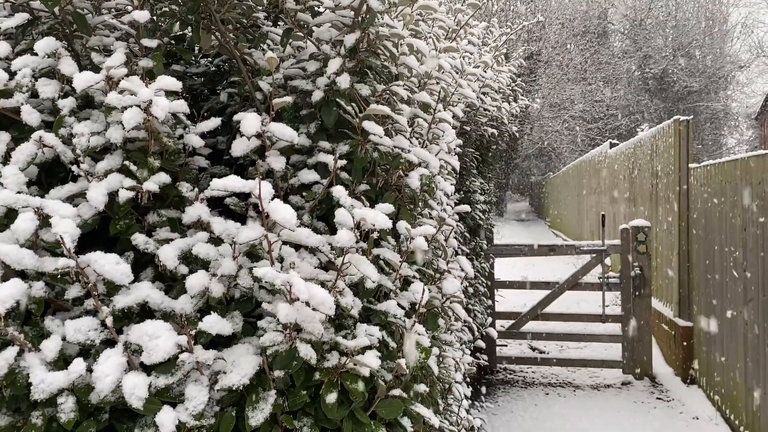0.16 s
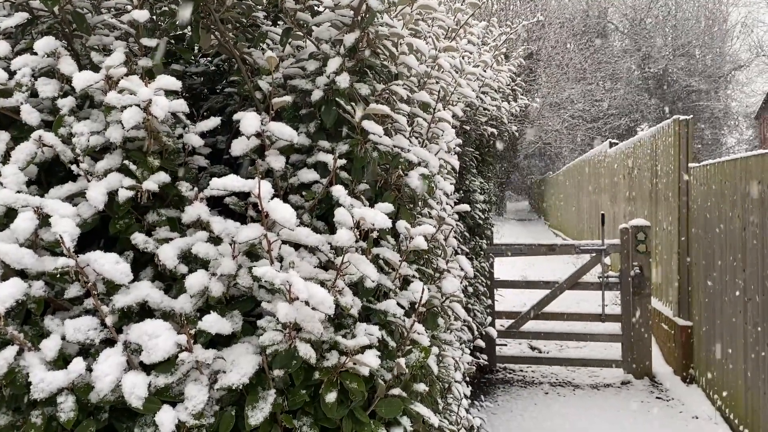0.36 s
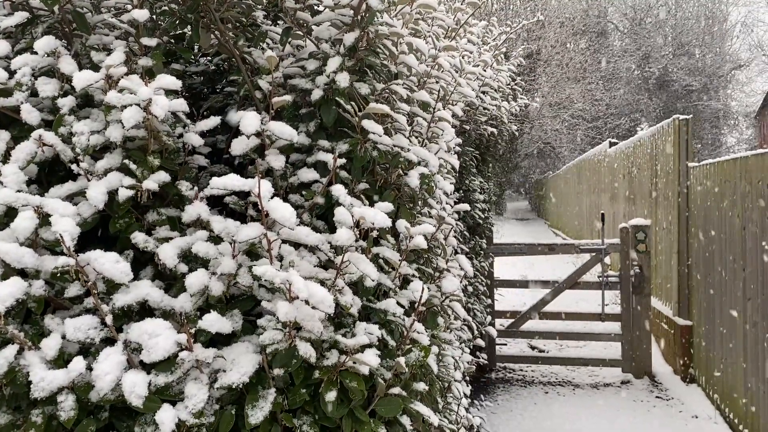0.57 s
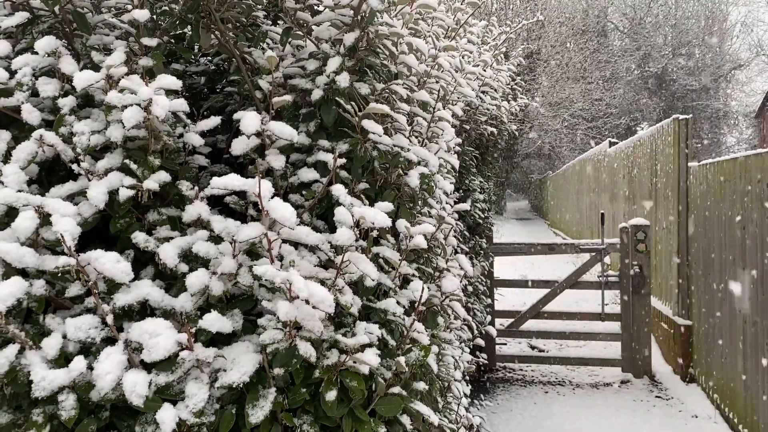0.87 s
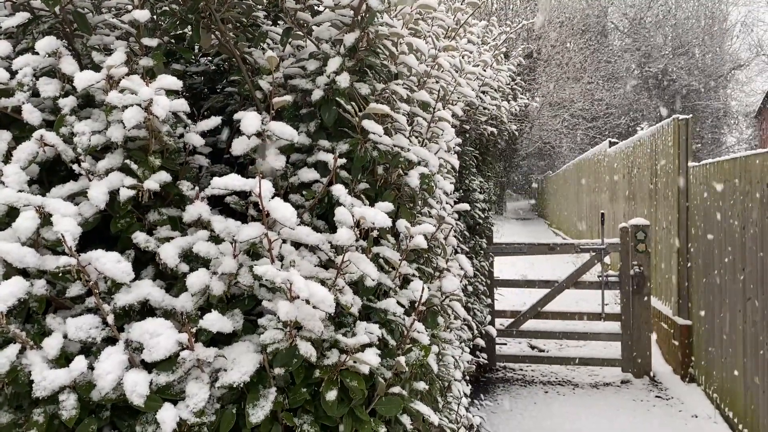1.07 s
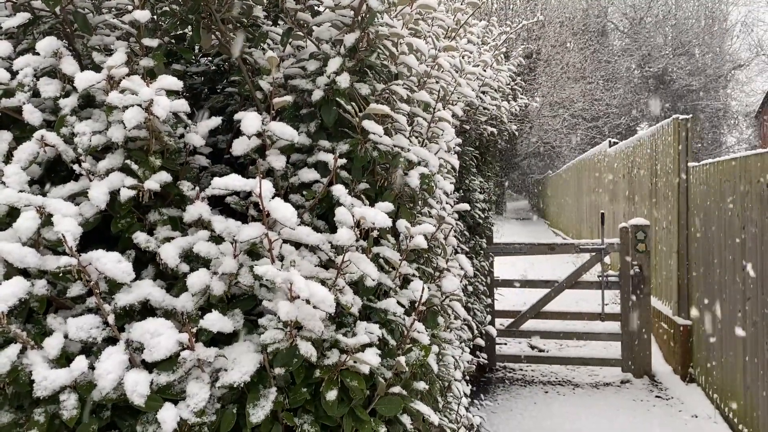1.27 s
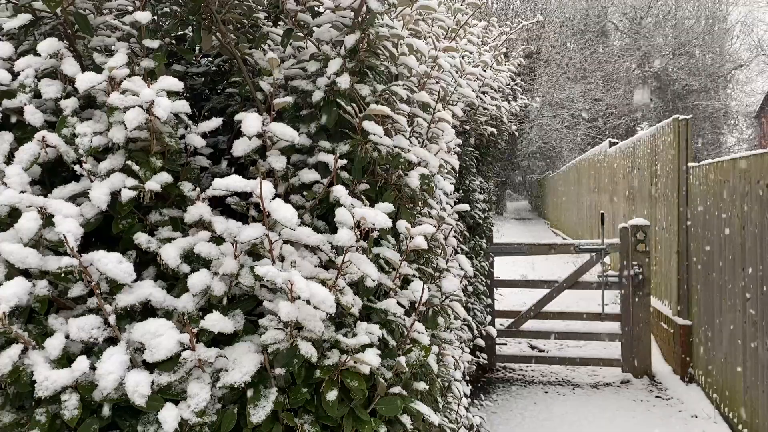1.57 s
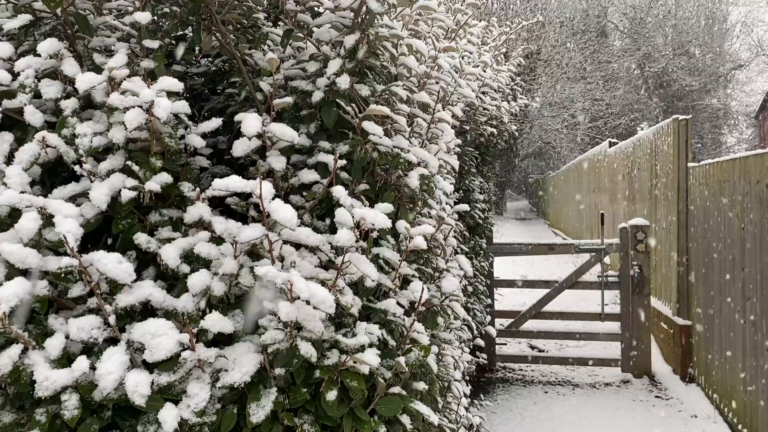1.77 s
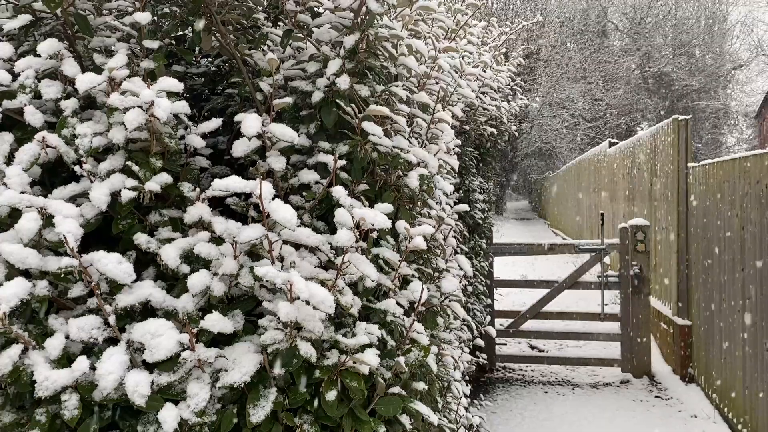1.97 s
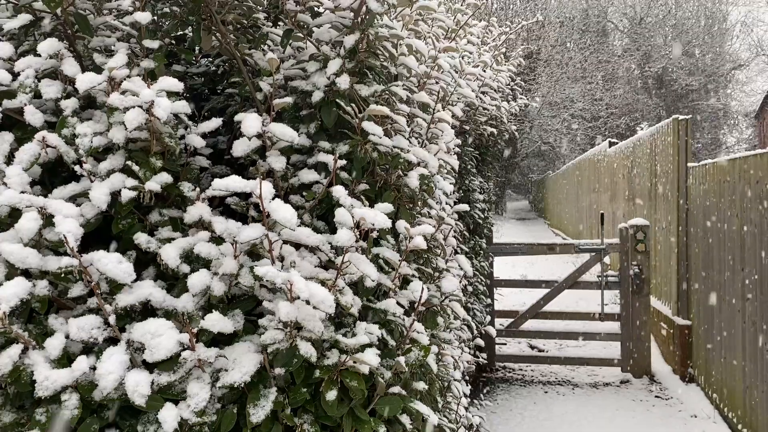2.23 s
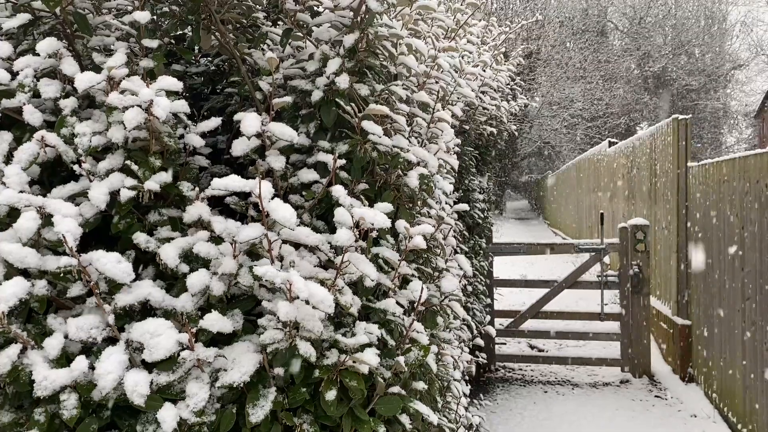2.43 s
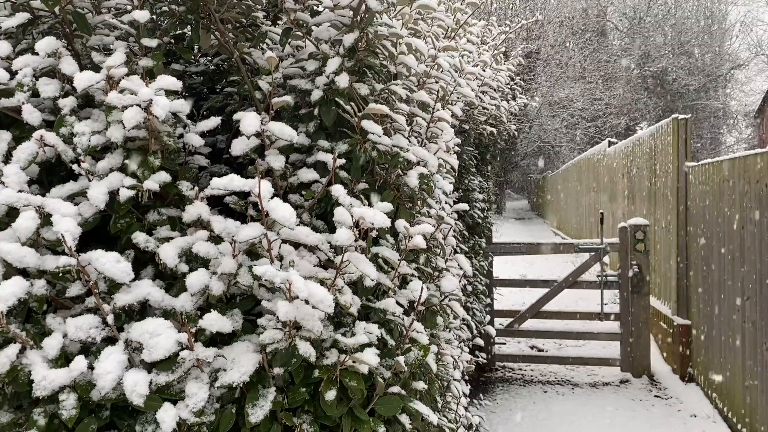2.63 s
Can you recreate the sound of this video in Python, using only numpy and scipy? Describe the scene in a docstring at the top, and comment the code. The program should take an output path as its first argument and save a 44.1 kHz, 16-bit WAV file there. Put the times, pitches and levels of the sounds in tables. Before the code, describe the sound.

A crow at some distance gives two hoarse, falling caws with a short diffuse echo from fence and trees, after a second of low wind thumps, faint traffic hum, tiny snow ticks and microphone hiss.

```python
"""A crow some way off caws twice over a snowy lane: rough pulses and breath shaped by a closing beak, with a
fence echo and an answer from hedges and trees. A farther crow is faintly heard, softer and duller.
Light wind thumps on the microphone as short low pushes over a flutter; distant traffic hums as shaped noise.
Snowflakes tick on the housing as tiny noise bursts, and the microphone pair hisses."""
import sys
import numpy as np
from scipy import signal
from scipy.fft import rfft, irfft, next_fast_len
from scipy.io import wavfile
from scipy.ndimage import uniform_filter1d, map_coordinates

SR = 44100
rng = np.random.default_rng(int(sys.argv[2]) if len(sys.argv) > 2 else 0)


def bounce(signal):
    """Save signal as a 16-bit WAV file at the path given by the first command-line argument."""
    frames = np.transpose(np.atleast_2d(signal))
    limited = np.clip(frames, -1, 1)
    pcm = np.round(limited * 32767).astype(np.int16)
    wavfile.write(sys.argv[1], SR, pcm)


def level_to_linear(level):
    """Convert decibel levels to linear amplitude factors, elementwise."""
    exponent = np.asarray(level, float) / 20
    return 10 ** exponent


N = 123479
T = np.arange(N) / SR


def unit(x):
    """Scale to rms 1."""
    return x / np.sqrt(np.mean(x ** 2) + 1e-20)


def along(points, hz):
    """Read a curve of (Hz, value) points on a log frequency axis."""
    f, v = np.transpose(points)
    return np.interp(np.log(hz + 1), np.log(f + 1), v)


def wobble(rate):
    """A smooth random curve with rate knots a second."""
    return map_coordinates(rng.standard_normal(N // 20), [T * rate])


def filtered(x, response):
    """Multiply the spectrum of x by a response of frequency."""
    m = next_fast_len(N + SR // 2)
    hz = np.fft.rfftfreq(m, 1 / SR)
    return irfft(rfft(x, m) * response(hz), m)[..., :N]


def coloured(x, points):
    """Shape x with a curve of (Hz, dB) points."""
    return filtered(x, lambda hz: level_to_linear(along(points, hz)))


def patchy(patchy_db):
    """Two noises that grow and fade together in patches of time and frequency."""
    z = signal.stft(rng.standard_normal((2, N)), nperseg=512)[2]
    field = uniform_filter1d(rng.standard_normal(z.shape[1:]), size=8, axis=0)
    field = uniform_filter1d(field, size=10, axis=1)
    return signal.istft(z * level_to_linear(patchy_db * unit(field)), nperseg=512)[1][:, :N]


def spread(pair, alike):
    """Mix two noises into left and right with the given likeness by frequency."""
    def mid_side_gains(hz):
        angle = np.arccos(np.clip(along(alike, hz), -1, 1)) / 2
        return np.array([np.cos(angle), np.sin(angle)])

    mid, side = filtered(pair, mid_side_gains)
    return np.array([mid + side, mid - side])


def sides(x, pan_db, turn):
    """Make left and right of one sound, with level and phase offsets (radians) by frequency."""
    def response(hz):
        phase = np.exp(np.array([[-.5j], [.5j]]) * turn(hz))
        return phase * level_to_linear(np.array([[.5], [-.5]]) * pan_db(hz))

    return filtered(x, response)


def ports(x):
    """Sound born in the housing reaches the two ports with a treble phase that winds up."""
    from_hz, full_turn_hz = 6880, 4380  # right gains a full turn on left per 4380 Hz above 6880 Hz
    return sides(x, lambda hz: 0 * hz, lambda hz: 2 * np.pi * np.maximum(hz - from_hz, 0) / full_turn_hz)


# How much of the hiss both sides have in common. Each row: frequency in Hz, share of the power, 0 to 1.
HISS_SHARE = [(2500, .15), (5800, .2), (7000, .8), (12000, .76)]
# Tone of the hiss. Each row: frequency in Hz, relative level in dB per Hz.
HISS_TONE = [(1500, -21), (2400, 2), (3300, -2.5), (5000, -3.5), (7300, -6.5), (9200, -6), (11200, -6.5),
             (13200, -8), (15000, -9), (15900, -13.5), (17000, -47)]


def hiss():
    """Microphone noise; in the treble both sides carry mostly the same noise."""
    level_db = -85.5
    shared = lambda hz: np.clip(along(HISS_SHARE, hz), 0, 1)
    own = filtered(patchy(2.8), lambda hz: np.sqrt(1 - shared(hz)))
    common = ports(filtered(patchy(0.49)[0], lambda hz: np.sqrt(shared(hz))))
    return level_to_linear(level_db + 0.27 * wobble(6.2)) * unit(coloured(own + common, HISS_TONE))


# Tone of the far roar. Each row: frequency in Hz, relative level in dB.
TRAFFIC_TONE = [(60, -15), (150, -1.5), (300, -6.5), (550, -7.5), (900, -9), (1500, -13.5), (1900, -20),
                (2200, -29), (3500, -58), (6000, -64)]
# How alike left and right are. Each row: frequency in Hz, likeness from -1 (opposite) to 1 (the same).
TRAFFIC_LIKENESS = [(150, 0.6), (380, .4), (700, -0.08), (1400, -0.45), (2200, 0.4)]


def traffic():
    """A far, smooth roar with little treble: shaped noise whose level sways gently."""
    level_db, sway_db = -66, .8
    level = level_to_linear(level_db + sway_db * wobble(3.5))
    return level * unit(spread(coloured(patchy(2.0), TRAFFIC_TONE), TRAFFIC_LIKENESS))


# Single wind pushes. Each row: centre in seconds, peak in dB before a random left-right lean,
# pitch at the centre in Hz, width in seconds (widened where it is under least_s).
WIND_THUMPS = [(0.249, -37, 82, 0.015), (0.332, -40, 76, 0.022), (0.359, -41, 78, 0.014),
               (0.378, -44.5, 80.4, 0.017), (0.414, -28, 119.4, 0.012), (0.448, -33.5, 84, 0.0075),
               (0.476, -36, 103.7, 0.01), (0.521, -54, 69, 0.011), (0.556, -30, 72, 0.012),
               (0.584, -35, 61, 0.022), (0.61, -35, 72.8, 0.015), (0.642, -44.5, 68, 0.017),
               (0.671, -35.5, 85.4, 0.014), (0.699, -38, 69, 0.023), (0.752, -43.5, 55.6, 0.017),
               (0.78, -41.5, 67, 0.035), (0.813, -46, 71, 0.01), (0.845, -40, 73, 0.031),
               (0.973, -52.5, 64.3, 0.045), (0.996, -37, 78, 0.022), (1.136, -37, 68, 0.014),
               (1.173, -42, 68, 0.019), (1.194, -50, 55.3, 0.014), (1.256, -44.5, 70, 0.015),
               (1.293, -44, 51.3, 0.014), (1.334, -56, 71, 0.0081), (1.376, -52.5, 62, 0.042),
               (1.981, -37, 63, 0.023), (2.072, -35.5, 70, 0.023), (2.152, -37.5, 76, 0.017),
               (2.177, -50, 66, 0.0094), (2.216, -43, 64.56, 0.012), (2.24, -39, 66, 0.009),
               (2.261, -36.5, 55, 0.017), (2.312, -42.5, 60.7, 0.016), (2.5, -39.5, 65.4, 0.033),
               (2.536, -46.5, 77, 0.027)]


def thumps():
    """Short low pushes of air that rise fast, die away more slowly and fall in pitch."""
    pitch_fall, least_s, lean_db = 0.84, 0.021, 1.6
    out = np.zeros((2, N))
    for s, db, hz, width in WIND_THUMPS:
        width = max(width, least_s)
        luck = rng.standard_normal(2)
        u = np.clip((T - s) / width, -4, 4)  # time in widths from the centre
        swell = np.exp(-np.where(u < 0, 3.5, 1.8) * u ** 2)
        phase = 2 * np.pi * hz * width * (u - pitch_fall * u ** 2 / 2) + 2 * luck[0]
        out += level_to_linear(db + lean_db * luck[1] * np.array([[1], [-1]])) * swell * np.cos(phase)
    return out


# Strength of the flutter. Each row: time in seconds, level in dB before lift_db and the random wobble.
FLUTTER_LEVEL = [(0.0, -58), (0.15, -58.5), (0.32, -52.5), (0.47, -42.5), (0.55, -53.5), (0.93, -61),
                 (1.02, -50), (1.22, -55.5), (1.64, -58), (1.77, -60), (2.04, -59), (2.16, -53),
                 (2.42, -61), (2.57, -56.5), (2.8, -62)]
# Tone of the flutter. Each row: frequency in Hz, relative level in dB per Hz.
FLUTTER_TONE = [(12, -42), (20, -1), (48, -4.5), (64, 1), (82, -6.5), (119, -14.5), (173, -16),
                (260, -28.5), (340, -30.5), (570, -120)]


def wind():
    """Single pushes over a lumpy low flutter of shaped noise."""
    lift_db = 3.06
    pushes = thumps()
    level_db = np.interp(T, *np.transpose(FLUTTER_LEVEL)) + 2.8 * wobble(14)
    flutter = spread(coloured(patchy(2.3), FLUTTER_TONE), [(30, 0.44), (130, .8)])
    return pushes + level_to_linear(level_db + lift_db) * unit(flutter)


# Clear snowflake ticks. Each row: start in seconds, click strength in dB before the noise and housing
# shape it, spray in dB relative to the click.
FLAKE_TICKS = [(0.1087, -66, -14.5), (0.652, -53, -18.5), (0.6546, -59, -19), (0.6633, -49.5, -20),
               (0.6714, -78.5, -13), (0.7368, -64.5, -8), (0.8135, -80, -16), (1.5517, -70, -16),
               (1.5768, -67, -20), (1.6245, -68, -13), (1.6494, -69, -16), (1.9021, -70, -5),
               (2.1524, -71, -18), (2.1987, -57.5, -20)]
# Ring of the housing. Each row: frequency in Hz, gain in dB.
HOUSING_TONE = [(2000, -32), (3800, -17.5), (5600, -23), (7500, -7.5), (9100, -11), (11300, -5.5),
                (13400, -7), (15000, -4), (16300, -21)]


def snow():
    """Each flake: a tiny click and a short spray, rung by the housing; many faint ones fall at random."""
    click_s, spray_s = .0003, 0.019
    faint_per_s, faint_db, faint_spray_db = 18, -85, -5
    luck = rng.random((200, 2))
    faint_start = np.cumsum(-np.log(1 - luck[:, 0])) / faint_per_s
    faint = np.c_[faint_start, faint_db + 9 * luck[:, 1], np.full(200, faint_spray_db)]
    shape, t = np.zeros(N + SR), T[:SR // 8]
    click = t / click_s * np.exp(1 - t / click_s)
    spray = np.exp(-t / spray_s)
    for s, db, spray_db in [*FLAKE_TICKS, *faint[faint_start < N / SR]]:
        shape[round(s * SR):][:len(t)] += level_to_linear(db) * (click + level_to_linear(spray_db) * spray)
    return ports(coloured(shape[:N] * rng.standard_normal(N), HOUSING_TONE))


# How long the answer rings. Each row: frequency in Hz, seconds to fall by 60 dB.
TREES_RING = [(500, 0.4), (1800, 0.61), (3500, .25), (8000, 0.04)]


def trees(x):
    """Diffuse answer of hedges and trees: fading noise tails, drawn anew every quarter second."""
    out, step = np.zeros((2, N + SR)), SR // 4
    for i in range(0, N, step):
        hz, t, z = signal.stft(rng.standard_normal((2, SR // 2)), SR, nperseg=256)
        fade = level_to_linear(-60 * t / along(TREES_RING, hz)[:, None])
        tail = signal.istft(z * fade, SR, nperseg=256)[1]
        wet = signal.fftconvolve(x[None, i:i + step], tail / np.linalg.norm(tail[0]), axes=1)
        out[:, i:i + wet.shape[1]] += wet
    return out[:, :N]


def fence_echo(x):
    """One weaker, later copy of the call."""
    delay_s, level_db = .125, -18.5
    return level_to_linear(level_db) * np.pad(x, (round(delay_s * SR), 0))[:N]


def syrinx(pitch_hz):
    """Uneven pulses mixed with breath noise that swells once a cycle, all shaken by a rattle."""
    jitter, waver, shimmer_db = .027, .01, 2.4  # cycles, share of the pitch, dB from pulse to pulse
    rasp_share, rattle_hz, rattle_depth = .36, 62, .2  # rasp_share is the breath's part of the power
    cycles = np.cumsum(pitch_hz * (1 + waver * wobble(70))) / SR
    luck = rng.standard_normal((N // 50, 2))
    k = np.arange(1, int(cycles[-1]))
    at = np.interp(k + jitter * luck[k, 0], cycles, np.arange(N))
    whole, part = np.minimum(at.astype(int), N - 2), at % 1
    size = level_to_linear(shimmer_db * luck[k, 1])
    # a pulse between two samples is shared out to both
    pulses = np.bincount(whole, size * (1 - part), N) + np.bincount(whole + 1, size * part, N)
    rasp = rng.standard_normal(N) * (1 + np.cos(2 * np.pi * cycles) / 2)
    rattle_cycles = np.cumsum(rattle_hz * (1 + 0.1205 * wobble(15))) / SR
    rattle = 1 + rattle_depth * np.sin(2 * np.pi * rattle_cycles)
    voice = np.sqrt(1 - rasp_share) * unit(pulses - pulses.mean()) + np.sqrt(rasp_share) * unit(rasp)
    return unit(rattle * voice)


# Throat with the beak open. Each row: frequency in Hz, relative level in dB.
OPEN_THROAT = [(400, -38.5), (800, -14), (1050, -9.5), (1300, -12), (1650, -8), (1980, -1.1), (2150, -9),
               (2400, -25.5), (2950, -15.5), (3200, -21.5), (3400, -19), (3750, -37), (4300, -40.5),
               (5250, -30.5), (5650, -19.5), (6100, -37.5), (7500, -43), (9000, -61.5)]
# Throat with the beak closing, point for point. Each row: frequency in Hz, relative level in dB.
CLOSING_THROAT = [(400, -40), (750, -17), (890, -10), (1150, -20), (1320, -6), (1420, -.2), (2120, -13),
                  (2450, -26), (2750, -25), (3100, -28), (3570, -22), (3900, -32), (4400, -37), (4950, -26),
                  (5400, -26), (6200, -40), (7500, -48), (9000, -70)]


def throat(closing):
    """Resonances slide in pitch and level from the open (0) to the closing (1) beak."""
    return (1 - closing) * np.array(OPEN_THROAT) + closing * np.array(CLOSING_THROAT)


# Caws of the farther crow. Each row: start in seconds, length in seconds, starting pitch in Hz,
# level in dB before the soft edges and the trees.
FARTHER_CAWS = [(-.2, 0.36, 327.5, -74.5), (1.914, .2, 313.3, -70)]


def far_crow():
    """Soft-edged, sagging caws that lost their treble on the way."""
    edge_s, sag, top_hz = 0.052, .06, 1980  # sag is the share of the pitch lost over a caw
    out = np.zeros(N)
    for s, length, hz, db in FARTHER_CAWS:
        gate = np.clip(np.minimum(T - s, s + length - T) / edge_s, 0, 1)
        pitch_hz = hz * (1 - sag * np.clip((T - s) / length, 0, 1))
        voice = coloured(syrinx(pitch_hz), throat(0.28))
        dull = filtered(voice, lambda f: 1 / (1 + (f / top_hz) ** 8))
        out += level_to_linear(db) * gate * unit(dull)
    return out


# The two near caws, each a list of points. Each row: time in seconds, pitch in Hz,
# level in dB before the voice is placed, beak closing from 0 to 1, treble in dB against the rest.
NEAR_CAWS = [
    [(1.135, 344.7, -101.5, 0.2, 1.5), (1.155, 344.3, -69.5, 0.2, 7.5), (1.19, 354.7, -63, .2, 4.5),
     (1.24, 364.2, -60, 0.07, -0.8), (1.35, 359.5, -59.5, 0.33, 1), (1.41, 336.9, -60, 0.2, .3),
     (1.5, 328.9, -59, 0.8, 1.8), (1.53, 315.8, -62.5, 0.86, 1.5), (1.565, 307.6, -62, 0.98, -6),
     (1.585, 305.2, -72.5, .8, 16), (1.62, 300, -102, 1, -10)],
    [(1.99, 305, -72.5, .1, -11), (2.008, 322.3, -69.5, 0, 8), (2.07, 336.5, -59.5, 0, 1),
     (2.16, 332.1, -56.5, 0.1, -1), (2.23, 319.7, -59.5, 0.64, 4), (2.3, 300.5, -60, 1, 2.4),
     (2.38, 286.3, -64, 0.97, 1), (2.41, 279.3, -64.5, .98, -7), (2.45, 279.6, -64, .99, -14),
     (2.468, 275, -99, 0.96, -12)],
]


def near_crow():
    """A rough voice whose throat resonances glide as the beak opens and closes."""
    treble_from_hz = 2350
    s, pitch_hz, level_db, closing, treble_db = np.transpose(np.concatenate(NEAR_CAWS))
    hz, t, z = signal.stft(syrinx(np.interp(T, s, pitch_hz)), SR, nperseg=1024, noverlap=896)
    beak = np.clip(np.interp(t, s, closing), 0, 1)
    gain_db = np.transpose([along(throat(c), hz) for c in beak])
    gain = level_to_linear(gain_db + (hz[:, None] > treble_from_hz) * np.interp(t, s, treble_db))
    gain = gain / np.linalg.norm(gain, axis=0)
    voice = signal.istft(z * gain, SR, nperseg=1024, noverlap=896)[1][:N]
    return level_to_linear(np.interp(T, s, level_db)) * unit(voice)


# Side the near crow leans to. Each row: frequency in Hz, left minus right in dB.
CROW_LEAN = [(1000, -1.5), (2000, -1.8), (3000, .4), (5500, 2.5)]
# Phase between the sides. Each row: frequency in Hz, radians by which right leads.
CROW_PHASE = [(700, 1), (2000, -0.27), (3400, -0.9), (4400, 1), (6000, .2)]


def near_crow_direct(near):
    """The straight path to both sides, with level and phase differences by frequency."""
    return level_to_linear(-1.5) * sides(near, lambda hz: along(CROW_LEAN, hz), lambda hz: along(CROW_PHASE, hz))


def scene():
    """Crows with a fence echo and the trees' answer, over wind, traffic, snow and hiss."""
    near, far = near_crow(), far_crow()
    direct = near_crow_direct(near)
    answer = trees(level_to_linear(-8) * near + fence_echo(near) + far)  # the far crow is heard only this way
    return direct + answer + wind() + traffic() + hiss() + snow()


def top_cut(x):
    """Nothing passes above the cut-off."""
    return signal.sosfilt(signal.butter(12, 16410, fs=SR, output="sos"), x)


def record(dry):
    """A second-order low cut against wind."""
    cut_hz = 40.7
    cut = filtered(dry, lambda hz: (1j * hz) ** 2 / ((1j * hz) ** 2 + 1.4j * hz * cut_hz + cut_hz ** 2))
    return top_cut(cut)


dry = scene()
out = record(dry)
bounce(out)
```